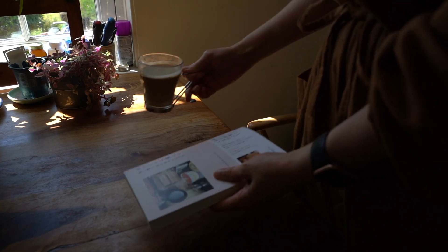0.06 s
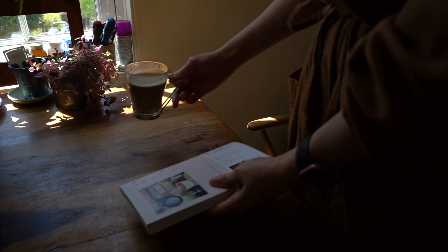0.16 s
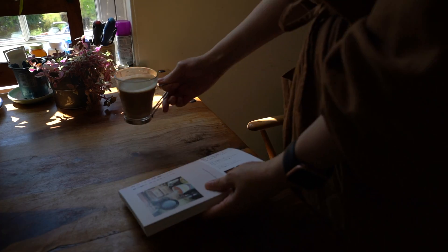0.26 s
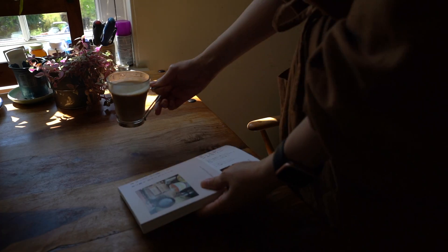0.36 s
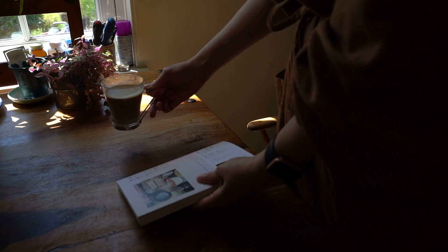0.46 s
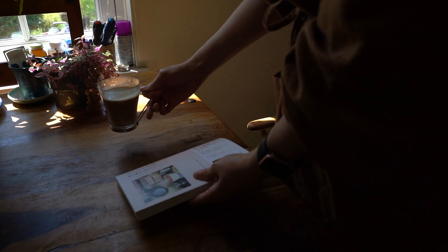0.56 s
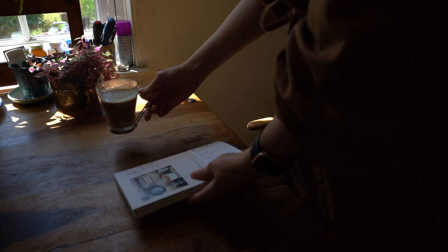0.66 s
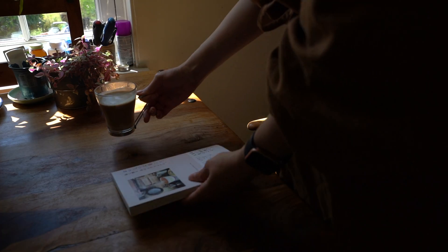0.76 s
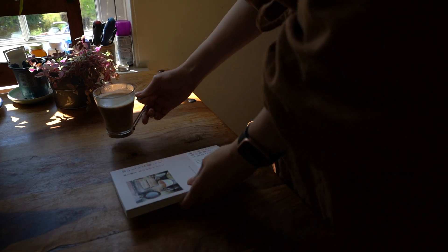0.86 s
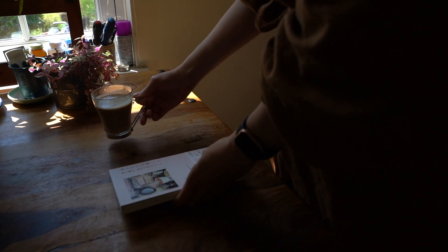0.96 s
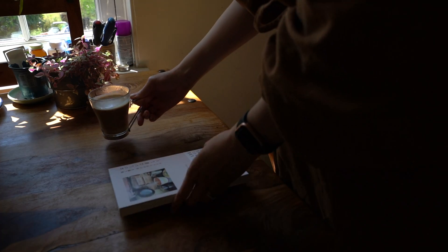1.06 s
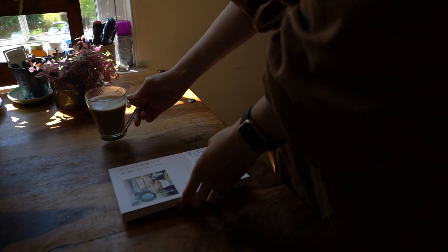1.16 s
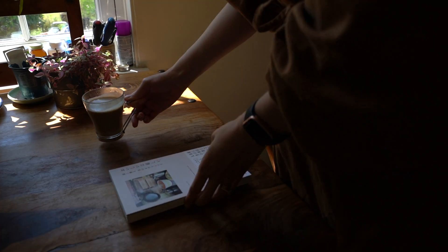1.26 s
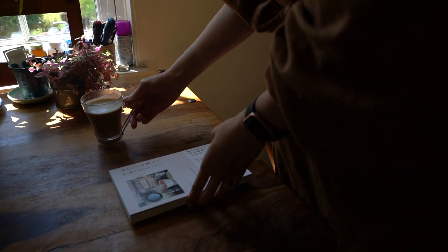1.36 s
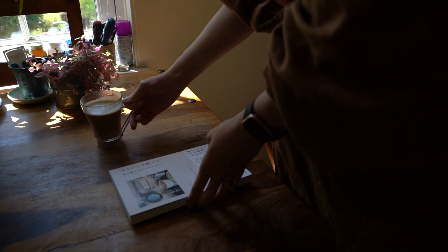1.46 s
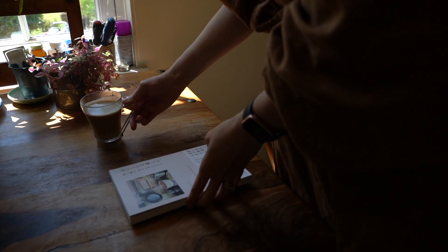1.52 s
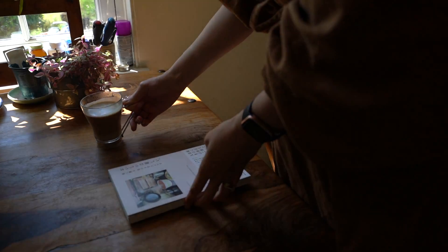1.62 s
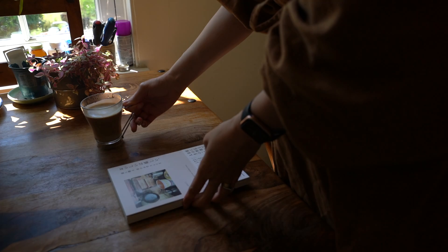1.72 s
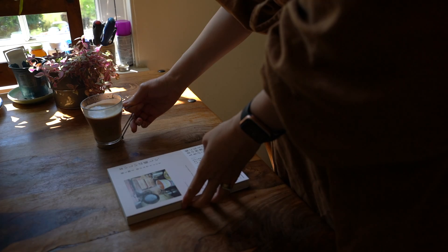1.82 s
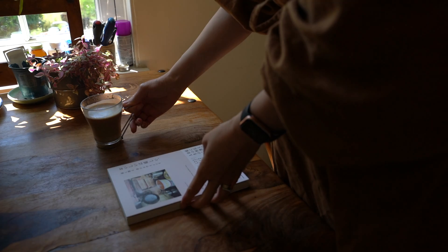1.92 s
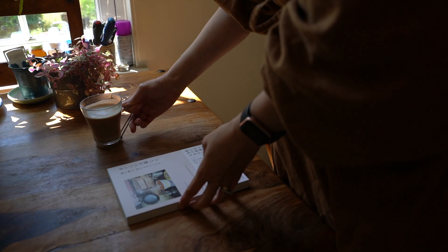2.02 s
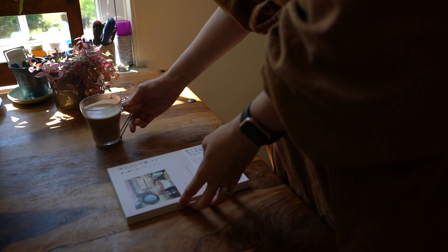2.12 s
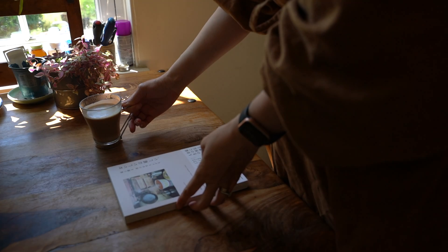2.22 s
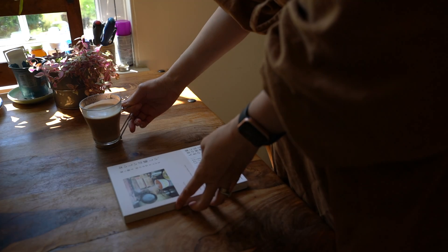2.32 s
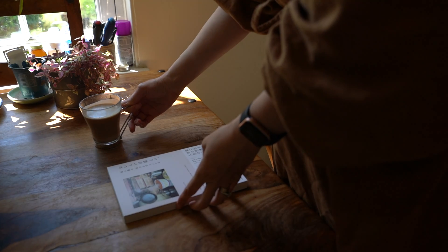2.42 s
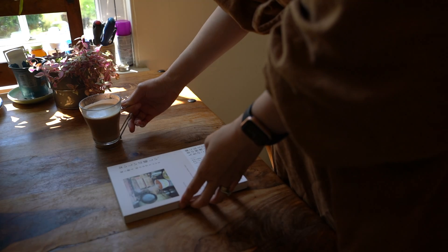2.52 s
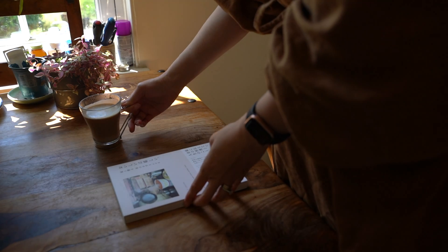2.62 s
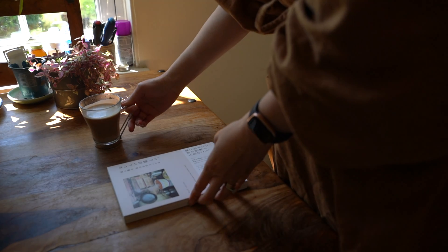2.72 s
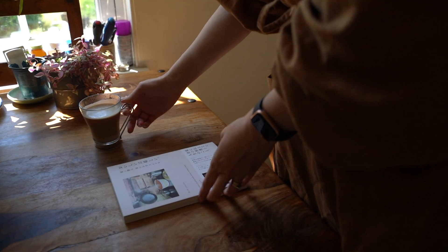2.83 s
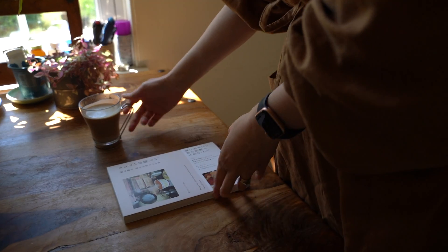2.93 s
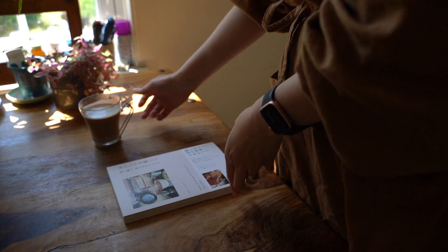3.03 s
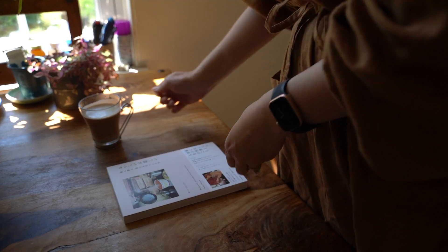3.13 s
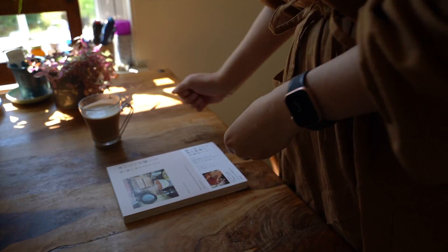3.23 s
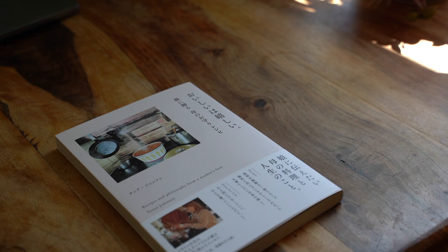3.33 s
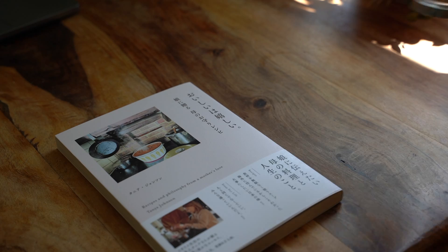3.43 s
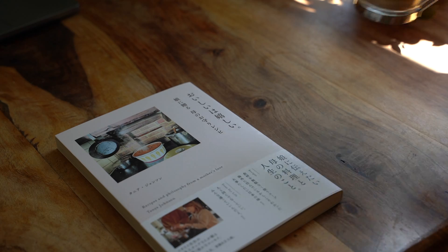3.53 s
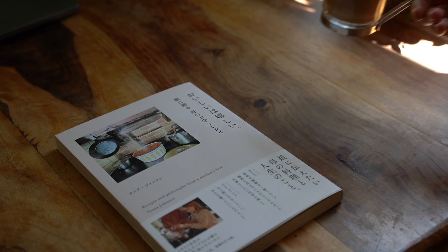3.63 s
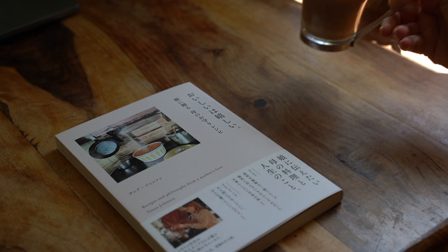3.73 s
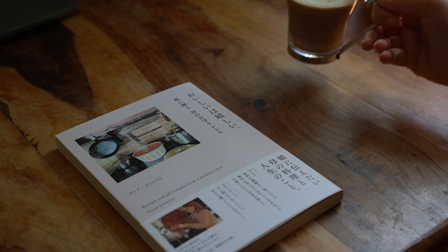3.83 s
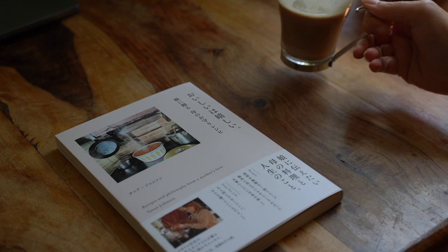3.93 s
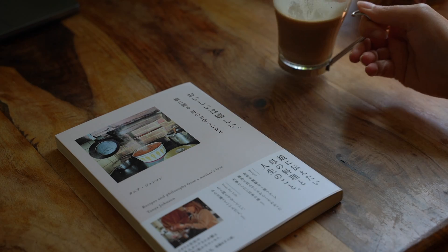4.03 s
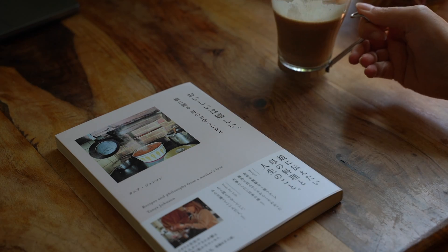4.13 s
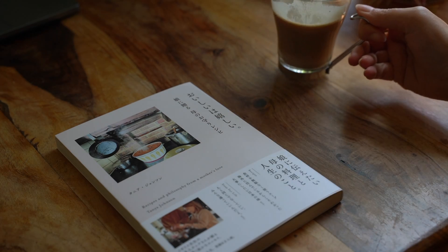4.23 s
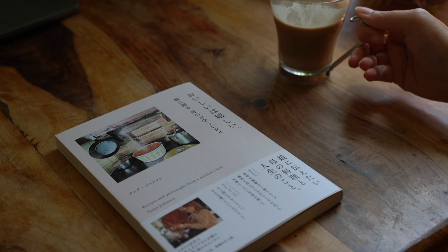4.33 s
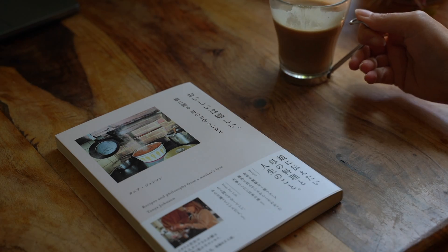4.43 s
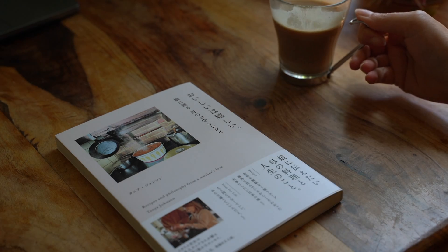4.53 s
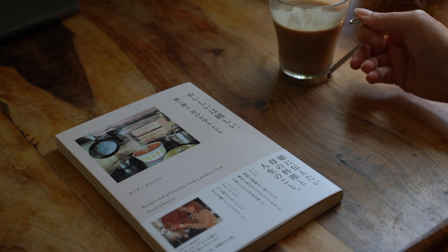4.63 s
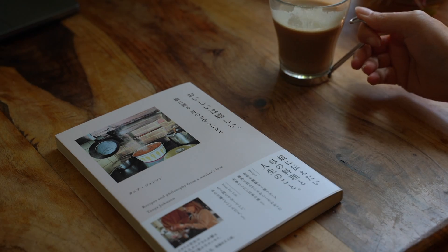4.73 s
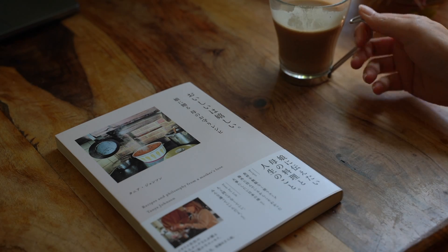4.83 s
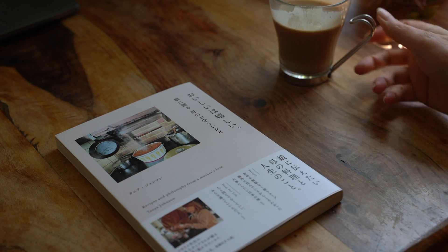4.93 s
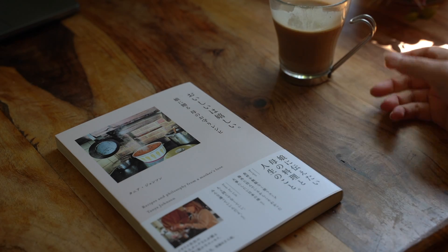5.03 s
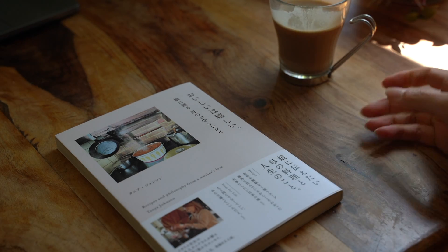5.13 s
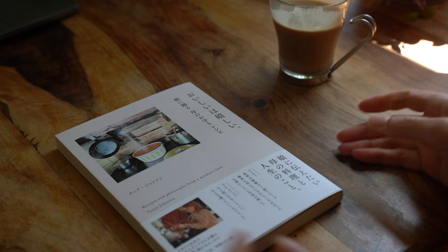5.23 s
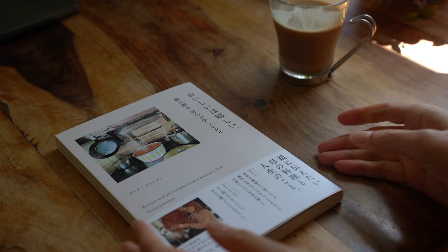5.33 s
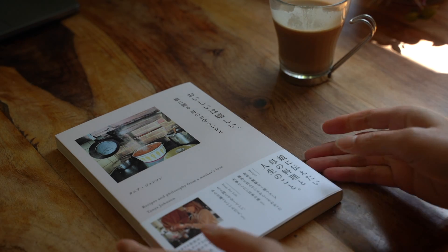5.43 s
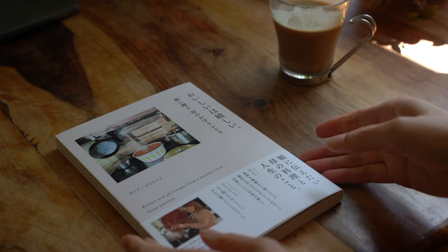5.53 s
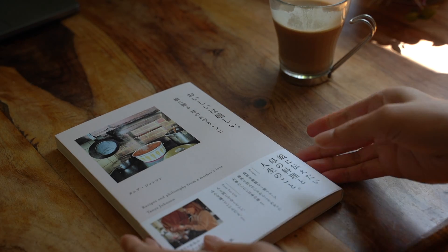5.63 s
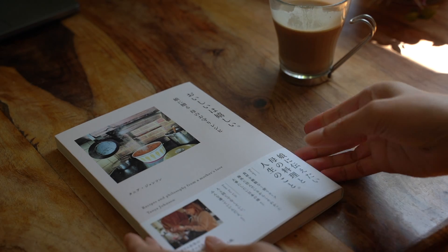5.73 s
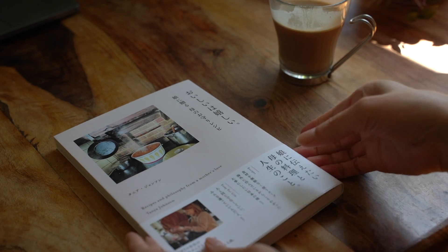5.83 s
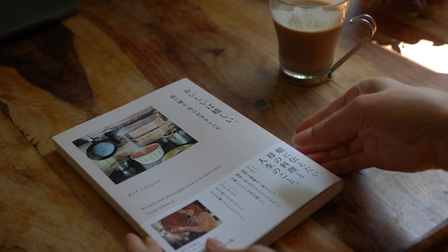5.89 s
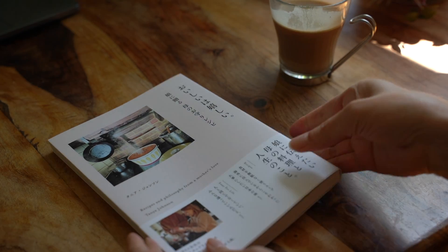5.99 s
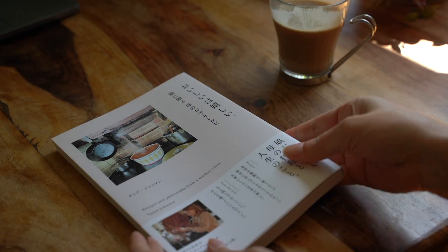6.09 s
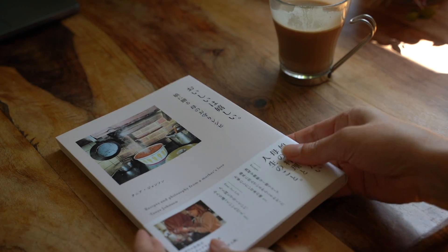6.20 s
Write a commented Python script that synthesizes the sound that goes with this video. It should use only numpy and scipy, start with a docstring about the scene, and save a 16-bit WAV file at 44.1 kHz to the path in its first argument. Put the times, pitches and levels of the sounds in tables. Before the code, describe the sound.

In a small quiet room, close stereo microphones catch sleeves rustling as a paperback is put on a wooden table with a quick light double tap. A full glass mug follows with a duller woody knock. The rustle thins almost to silence, then the mug lands again, loudest of all, with a short room echo. A small click and scuff follow, then cloth and fingers brush the table and book.

```python
"""Sleeves rustle close by, then a paperback and later a full glass mug are set down on a wooden table. The
place is a small quiet room with a left and a right microphone; the mug lands twice. Each contact is a short
push that rings the table top and fills the room by echoes and a noise tail. Skin and paper slide with a thin
hiss, and scuffs are grainy noise through one resonance. The loudest knock jolts and a passing arm fans slow
air, a wobbling low tone, mainly over the left microphone."""
import sys
import numpy as np
from scipy import signal
from scipy.fft import rfft, irfft, next_fast_len
from scipy.io import wavfile
from scipy.ndimage import uniform_filter1d

SR = 44100
rng = np.random.default_rng(int(sys.argv[2]) if len(sys.argv) > 2 else 0)


def waveform_to_disk(signal):
    """Save audio, clipped to [-1, 1], as 16-bit WAV at the path in sys.argv[1]."""
    frames = np.transpose(np.atleast_2d(signal))
    scaled = np.clip(frames, -1, 1) * 32767
    samples = np.round(scaled).astype(np.int16)
    wavfile.write(sys.argv[1], SR, samples)


N = 276021

# how busily the sleeves move: start_s, level_db
SLEEVE_ACTIVITY = [(0.0, -52), (0.19, -51.5), (0.45, -56), (0.73, -57), (0.95, -55.5), (1.25, -54),
                   (1.5, -64), (1.75, -59.5), (2.1, -66), (2.55, -68.5), (2.95, -59), (3.3, -57),
                   (3.55, -61.5), (3.95, -69), (4.4, -96), (4.86, -79), (4.96, -54), (5.3, -52.5),
                   (5.85, -61), (6.1, -60), (6.26, -67)]
# quick strokes of skin or paper over the table:
# peak_s, hiss_db, rise_s (per 20 dB), fall_s (per 20 dB), dragged_cloth_db
STROKES = [(0.75, -67, 0.12, 0.12, -66), (1.14, -58.5, 0.3, 0.05, -70), (1.797, -69, 0.07, 0.03, -54),
           (2.23, -71, .15, 0.28, -66.5), (5.15, -66.5, 0.6, .5, -79), (6.03, -62, 0.1, .5, -67),
           (6.205, -50.5, .13, .08, -54.5)]
# noise colour of sleeve cloth: pitch_hz, relative level_db (per Hz)
SLEEVE_COLOUR = [(35, -55), (60, -31), (121, -20), (216, -17.5), (352, -11.5), (386, -11), (444, -7),
                 (1100, -1.5), (5750, -8), (15600, -26.5)]
# noise colour of sliding skin and paper: pitch_hz, relative level_db (per Hz)
SLIDE_COLOUR = [(1500, -28), (3500, -20), (6000, 2), (9000, 4), (13000, 0), (15800, 1)]
# noise colour of room tone and microphone hiss: pitch_hz, relative level_db (per Hz)
QUIET_COLOUR = [(12, -57), (20, -37), (81, -21.5), (232, -6.5), (334, -6.5), (522, -1), (729, 0), (886, -3),
                (2290, -3.5), (2700, -5), (5740, -7), (14000, -11), (15600, -10.5)]
# likeness of the two microphones in noise: pitch_hz, correlation (0 to 1)
LIKENESS = [(60, 1), (290, 1), (640, 0.59), (1400, 0.27), (3000, 0.016), (15000, 0.014)]
# contacts on the table: start_s, level_db, push_low_hz, push_high_hz, ring_db, bass_modes_db,
# room_db, tick_hz, tick_width_hz, tick_db, left_minus_right_db
CONTACTS = [(0.7425, -33.5, 503, 1520, -54, 0, -0.5, 3000, 3000, -5, -1),
            (0.7448, -29, 298, 970, -48, 5.5, -7.5, 2280, 2490, 2, 0.5),
            (0.813, -48, 1500, 2960, -62, 0, -9, 3500, 2500, -3, 0),
            (0.8373, -29.5, 686, 1520, -51, -27, -0.5, 3080, 2570, -1, 1.5),
            (1.834, -25.5, 248, 1054, -42, 2, 4, 2580, 1500, -24, 0),
            (1.856, -32, 350, 1100, -48, -6, 3, 2580, 1500, -30, 0),
            (4.4684, -15, 362, 1400, -43, -3, 4.5, 2640, 1200, -37.5, 0.5),
            (4.901, -48.5, 500, 1000, -51, -2, -3, 2500, 773, -14, -10),
            (4.912, -39.5, 398, 1560, -49.5, 6.5, -5, 2450, 600, -1, -6.5),
            (4.921, -43.5, 600, 1490, -50, -5, -6, 2400, 610, 1, -6),
            (5.36, -41, 453, 1600, -60, 6, -1, 2530, 1500, -4.5, -3),
            (5.623, -50.5, 1500, 1900, -59, 5, 3, 3860, 900, 5, -1),
            (6.028, -44, 554, 905, -67, -4, -4, 2470, 1500, -23, -2)]
# modes of the table top: pitch_hz, relative level_db, t60_s (time to fall 60 dB)
TABLE_MODES = [(150, -10, 0.47), (170, -15.5, 0.38), (247, -39, .35), (273.5, -11, .45), (321, -9.5, 0.53),
               (382.4, 0, 0.44), (415.6, 1, 0.46), (522, 3, 0.34), (589, -6, 0.56), (626, -5, 0.32),
               (679, 3, 0.24), (722, -13, .35), (746, 3.5, 0.32), (863, -1, 0.36), (880, -8, 0.23),
               (895, 4, 0.41), (1000, 0, 0.31), (1052, 1, 0.45), (1080, 3, 0.21), (1210, -12, .3),
               (1230, -25, .35), (1350, -3, 0.35), (1420, -22, 0.27), (1550, -3.5, 0.37), (1810, -24, .3)]
# echoes off the nearest surfaces: delay_s, relative level_db, right_extra_delay_ms
ECHOES = [(.0035, -15.5, 0.21), (.006, -4, -0.11), (0.0103, -16, 0.12), (.014, -5.5, -.2),
          (.0225, -8, 0.16)]
# how long the room rings: pitch_hz, t60_s (time to fall 60 dB)
ROOM_T60 = [(125, 0.91), (350, 0.43), (1000, 0.46), (2800, 0.43), (8000, 0.11)]
# brief scuffs, creaks and soft thumps of wood, paper and skin, and low rumbles with the fanned air: start_s,
# rise_s, hold_s, pitch_hz, width_hz, level_db, left_minus_right_db
SCUFFS = [(0.745, .01, .06, 75, 35, -81, 0), (1.836, .01, .08, 75, 35, -76, 0),
          (4.475, .01, .08, 70, 35, -79, 0), (0.855, .01, .03, 990, 400, -50, 4),
          (1.019, 0.021, 0.047, 940, 150, -62.5, 1), (1.205, 0.023, 0.17, 2010, 1520, -62.5, 6),
          (2.694, 0.0091, 0.036, 1300, 900, -67.5, 1), (2.813, 0.014, 0.026, 910, 200, -60, -2),
          (3.273, 0.0092, 0.036, 1700, 1000, -62.5, -7), (3.348, 0.0075, 0.023, 750, 250, -65, -3),
          (4.703, 0.02, 0.072, 170, 60, -70, 5), (4.72, .05, .3, 70, 51, -77, 9),
          (4.936, 0.014, 0.05, 1280, 900, -49.5, -1), (5.0, .02, .04, 1250, 900, -56, -0.5),
          (5.612, .005, 0.031, 1730, 300, -67, -9), (5.942, 0.027, 0.29, 150, 70, -78, 6),
          (6.0, .05, .2, 60, 40, -85, 0)]
# puffs of low wobble, the first a jolt from the loudest knock, the rest slow air: peak_s, level_db (before the
# split between sides), rise_s (per 20 dB), fall_s (per 20 dB; a negative one goes on climbing)
PUFFS = [(4.474, -84, .07, .13), (4.73, -72, .06, 0.5), (4.904, -63, .15, 0.34), (6.044, -86, 0.4, -1)]
BANDS_HZ = 30 * 2 ** np.arange(0, 9.6, .5)  # half-octave band centres

SLEEVE_TILT_DB, STROKE_TILT_DB = -.5, 3.5  # per octave about 1200 Hz; dragged cloth is brighter
SLEEVE_HISS_DB = -9.5  # skin hiss relative to the sleeve activity
MOVE_PAN_DB = -2  # left minus right
QUIET_DB = -61  # rms
TAIL_DB = -23.5  # late sound against the echoes
TOP_HZ = 15750  # upper edge of the recorder


def undb(db):
    """Amplitude gain of a level in dB."""
    return 10 ** (np.asarray(db) / 20)


def level(x, db):
    """Scale a signal to an rms level in dB."""
    return x * undb(db) / np.sqrt(np.mean(x ** 2))


def peak(x):
    """Scale a signal to a peak of 1."""
    return x / np.max(np.abs(x))


def sides(pan_db):
    """Gains of the left and right microphones for a left-minus-right difference."""
    return undb(np.array([pan_db, -pan_db]) / 2).reshape(2, -1)


def at(table, hz):
    """Value of a (Hz, value) table on a log-frequency axis."""
    table_hz, values = np.transpose(table)
    return np.interp(np.log(hz), np.log(table_hz), values)


def stereo(n, spectrum, likeness_scale=1.):
    """Spectrum of a stereo noise of rms 1, most alike in the bass, with its axis in Hz."""
    size = 2 * next_fast_len(n // 2 + 1)
    hz = np.maximum(np.arange(size // 2 + 1) * SR / size, 1.)
    like = np.clip(likeness_scale * at(LIKENESS, hz), 0, 1)
    mid, side = rfft(rng.standard_normal((2, size))) * undb(at(spectrum, hz))
    shared = np.sqrt(1 + like) * mid
    opposed = np.sqrt(1 - like) * side
    pair = np.array([shared + opposed, shared - opposed])
    return pair / np.sqrt(np.mean(irfft(pair) ** 2)), hz


def noise(n, spectrum, likeness_scale=1.):
    """Stereo noise in time, 2 x n, of the given colour."""
    pair, _ = stereo(n, spectrum, likeness_scale)
    return irfft(pair)[:, :n]


def bands(n, spectrum):
    """One stereo noise in overlapping half-octave bands (centre Hz, 2 x n) that add up."""
    pair, hz = stereo(n, spectrum)
    for centre in BANDS_HZ:
        share = np.clip(1 - 2 * np.abs(np.log2(hz / centre)), 0, 1)
        yield centre, irfft(pair * share)[:, :n]


def walk(rate):
    """Random levels held 1 / rate s and slewed twice; spread near 1."""
    hold = int(SR / rate)
    steps = np.repeat(rng.standard_normal(N // hold + 1), hold)
    return 1.3 * uniform_filter1d(uniform_filter1d(steps, hold), hold)[:N]


def swells(events):
    """Summed gains, straight in dB, that climb to each peak and then follow its fall time."""
    t = np.arange(N) / SR
    gain = 0
    for s, db, rise, fall in events:
        distance = np.where(t < s, (s - t) / rise, (t - s) / fall)
        gain = gain + undb(db - 20 * distance)
    return gain


def fibres(scatter_db, per_s):
    """Uneven catching of fibres: a quick random gain with occasional larger grains."""
    hold = int(SR / per_s)
    catches = undb(scatter_db * rng.exponential(size=N // hold + 1))
    grain = uniform_filter1d(np.repeat(catches, hold)[:N], hold)
    return level(grain, 0)


def movement():
    """Sleeves rustle broadly; skin and paper hiss as they slide, most in the quick strokes."""
    busy = undb(np.interp(np.arange(N) / SR, *np.transpose(SLEEVE_ACTIVITY)))
    hiss = swells((s, db, rise, fall) for s, db, rise, fall, _ in STROKES)
    drag = swells((s, db, rise, fall) for s, _, rise, fall, db in STROKES)
    sleeve = 0
    for hz, band in bands(N, SLEEVE_COLOUR):
        octaves = np.log2(hz / 1200)
        cloth = busy * undb(SLEEVE_TILT_DB * octaves) + drag * undb(STROKE_TILT_DB * octaves)
        sleeve = sleeve + band * cloth * undb(0.76 * walk(20))  # each band flickers by itself
    slide = noise(N, SLIDE_COLOUR) * (busy * undb(SLEEVE_HISS_DB) + hiss)
    both = sleeve * fibres(0.76, 300) + slide * fibres(0.91, 500)
    return both * sides(MOVE_PAN_DB)


def quiet():
    """Room tone and microphone hiss: steady noise, only loosely alike at the two microphones."""
    return undb(QUIET_DB) * noise(N, QUIET_COLOUR, likeness_scale=0.28)


def butter(x, order, hz, kind):
    """Butterworth filter of the given kind."""
    return signal.sosfilt(signal.butter(order, hz, kind, fs=SR, output="sos"), x)


def resonance(x, hz, width_hz):
    """One resonance passing a band of the given width."""
    return signal.lfilter(*signal.iirpeak(hz, hz / width_hz, fs=SR), x)


def room_tail(t):
    """Dense late sound that builds up in a few ms and dies at each pitch's own rate; thin in the bass."""
    colour = [(100, -15), (250, -8), (400, -4.5), (700, -3), (1200, -2.5), (4000, -0.5)]  # (Hz, dB per Hz)
    fading = sum(band * undb(-60 * t / at(ROOM_T60, hz)) for hz, band in bands(len(t), colour))
    return (1 - np.exp(-t / 0.00091)) * fading


def room(t, room_db):
    """Response at both microphones: direct sound, near echoes, then the tail."""
    air = np.tile((t == 0) * 1., (2, 1))
    for delay, db, right_ms in ECHOES:
        arrivals = [int(delay * SR), int((delay + right_ms * 1e-3) * SR)]
        air[[0, 1], arrivals] += undb(db + room_db)
    return air + undb(room_db + TAIL_DB) * room_tail(t)


def table_ring(t, force, bass_db):
    """The push sets the decaying sine modes of the table top ringing."""
    modes = 0
    for k, (hz, db, t60) in enumerate(TABLE_MODES):
        # where the blow lands decides how much the broad low modes take up
        strength = db + bass_db * (hz < 340)
        modes = modes + (-1) ** k * undb(strength - 60 * t / t60) * np.sin(2 * np.pi * hz * t)
    return signal.fftconvolve(modes, peak(force))[:len(t)]


def knock(low_hz, high_hz, ring_db, bass_db, room_db, tick_hz, tick_width_hz, tick_db, pan_db):
    """A push rings the table; near surfaces repeat it and the room smears it into a tail."""
    t = np.arange(SR // 2) / SR
    click = (t[:SR // 20] == 0) * 1.
    # a softer contact pushes longer and so loses its treble; a small patch radiates no bass
    force = butter(click, order=4, hz=high_hz, kind="low")
    push = peak(butter(force, order=3, hz=low_hz, kind="high"))
    tick = peak(resonance(resonance(click, tick_hz, tick_width_hz), tick_hz, tick_width_hz))
    contact = push + undb(tick_db) * tick
    heard = signal.fftconvolve(room(t, room_db), contact[None], axes=1)[:, :len(t)]
    ring = undb(ring_db) * table_ring(t, force, bass_db)
    # below its first mode the table top moves no air; the board first gives way, so pressure dips
    return -butter(heard + ring, order=3, hz=132, kind="high") * sides(pan_db)


def knocks():
    """Every contact on the table at its moment."""
    out = np.zeros((2, N + SR))
    for s, db, *touch in CONTACTS:
        sound = knock(*touch)
        start = int(s * SR)
        out[:, start:start + sound.shape[1]] += undb(db) * sound
    return out[:, :N]


def scuffs():
    """Grainy rubbing through a doubled resonance; each swells, holds and fades away."""
    out, t = 0, np.arange(N) / SR
    rub = noise(N, [(20, 0), (20000, 0)]) * fibres(1.8, 220)
    for s, rise, hold, hz, width_hz, db, pan_db in SCUFFS:
        swell = np.clip((t - s) / rise, 0, 1)
        fade = undb(-60 * np.maximum(t - s - rise - hold, 0) / 0.18)  # 60 dB in 0.18 s
        tone = resonance(resonance(rub, hz, width_hz), hz, width_hz)
        out = out + level(tone, db) * swell * fade * sides(pan_db)
    return out


def draught():
    """Air fanned by the arm, and the jolt of the loudest knock, wobbles mainly the left diaphragm, the right
    one out of step."""
    t = np.arange(N) / SR
    phase = np.array([1.1 * walk(8), 4.3 * walk(13)])  # wandering, left and right, in radians
    wobble = np.sin(2 * np.pi * 24.0 * t + phase)
    return wobble * swells(PUFFS) * undb(np.array([[8], [-4]]))  # left and right dB


def scene():
    """Movement over the quiet room, with knocks, scuffs and a low air wobble."""
    return movement() + quiet() + knocks() + scuffs() + draught()


def record(dry):
    """The recorder cuts the top steeply."""
    return signal.sosfilt(signal.ellip(12, .2, 80, TOP_HZ, fs=SR, output="sos"), dry)


dry = scene()
out = record(dry)
waveform_to_disk(out)
```